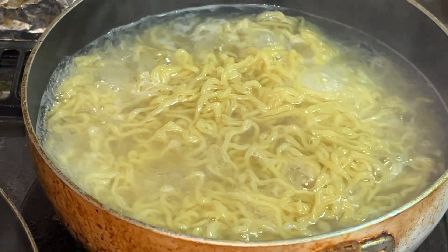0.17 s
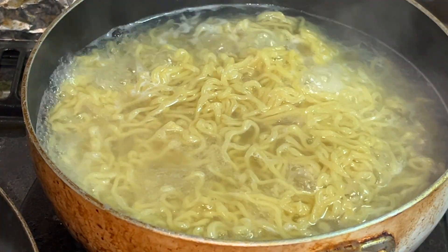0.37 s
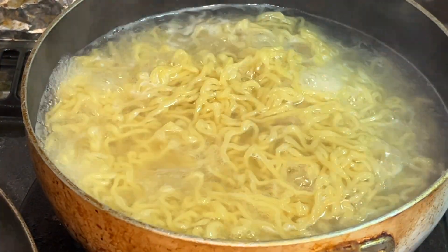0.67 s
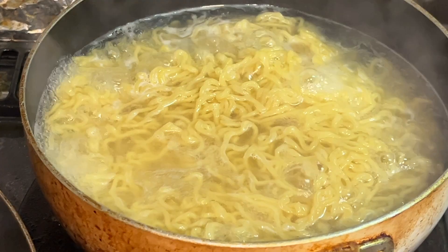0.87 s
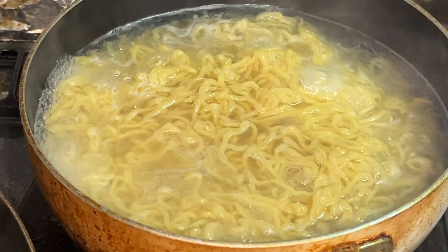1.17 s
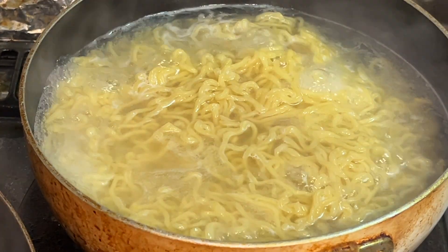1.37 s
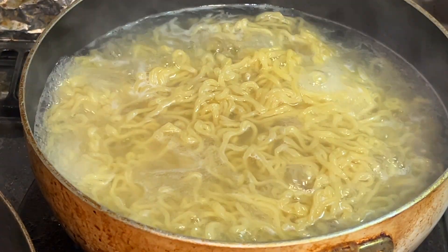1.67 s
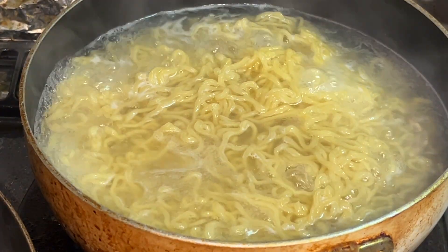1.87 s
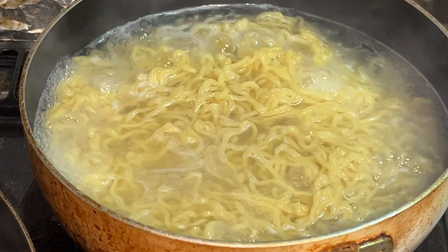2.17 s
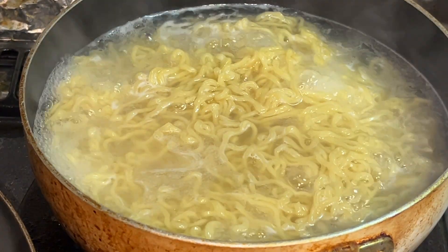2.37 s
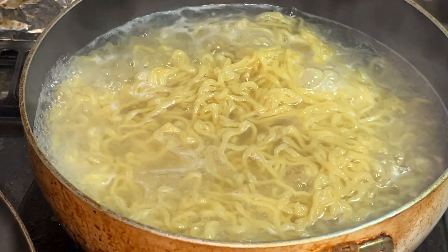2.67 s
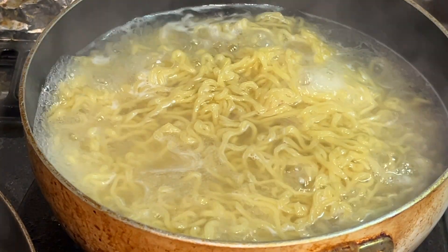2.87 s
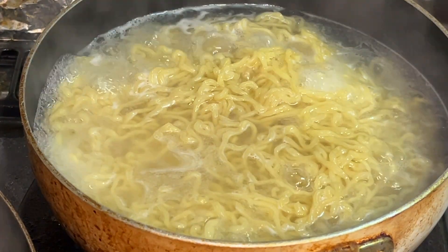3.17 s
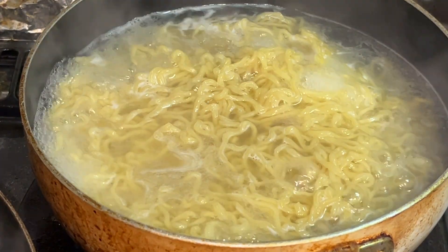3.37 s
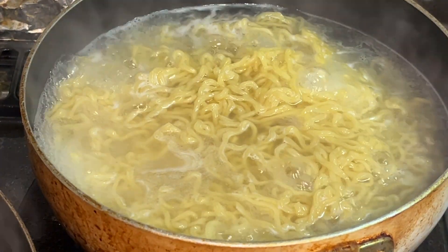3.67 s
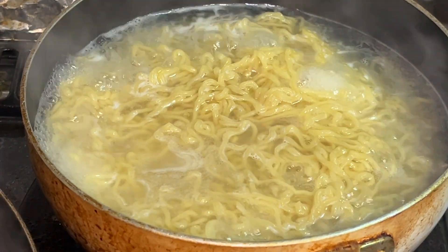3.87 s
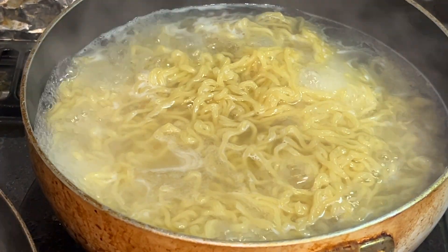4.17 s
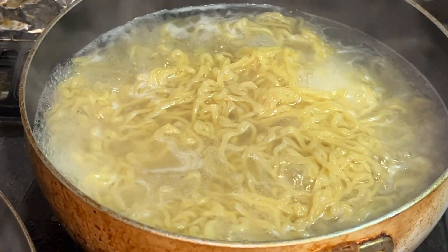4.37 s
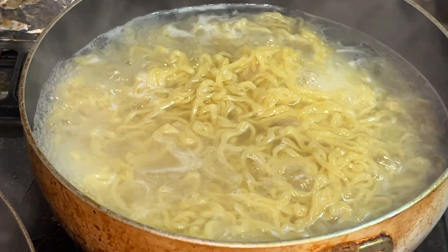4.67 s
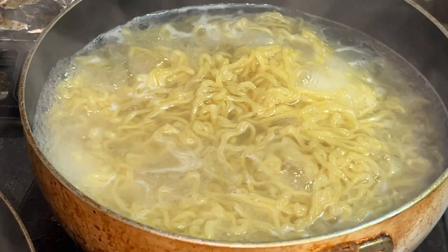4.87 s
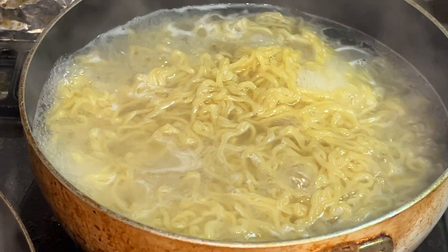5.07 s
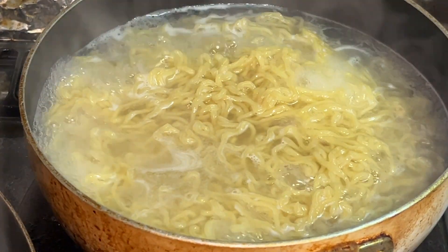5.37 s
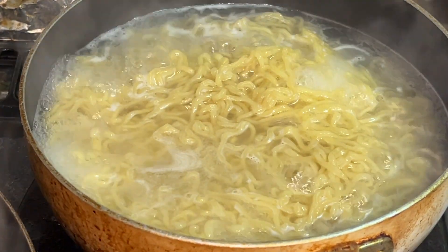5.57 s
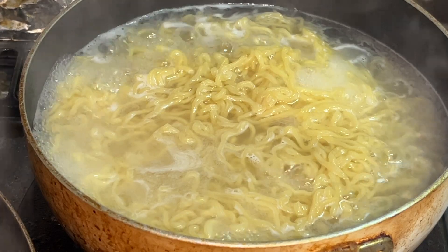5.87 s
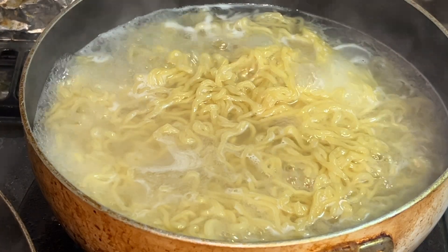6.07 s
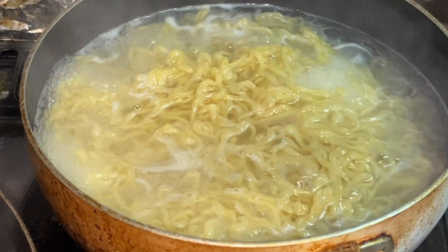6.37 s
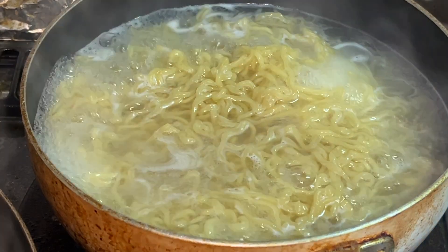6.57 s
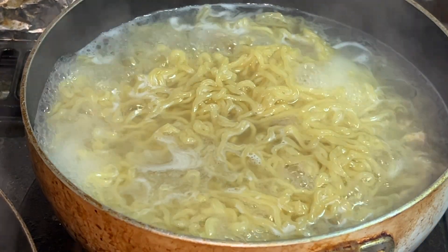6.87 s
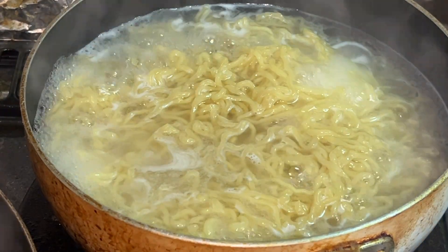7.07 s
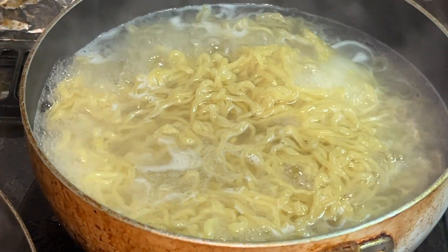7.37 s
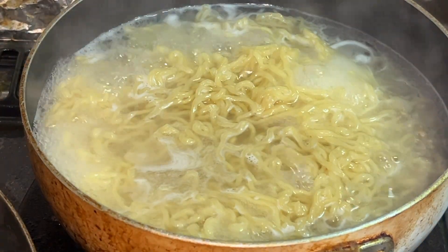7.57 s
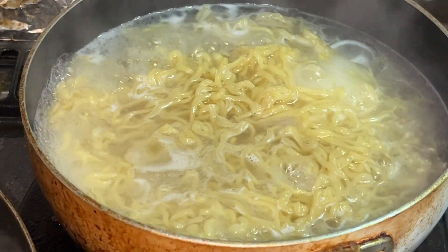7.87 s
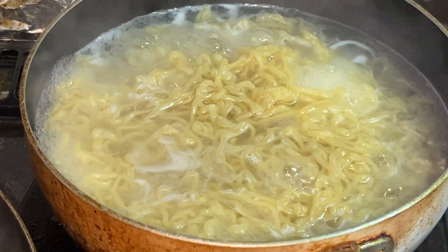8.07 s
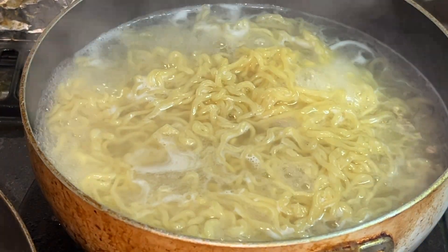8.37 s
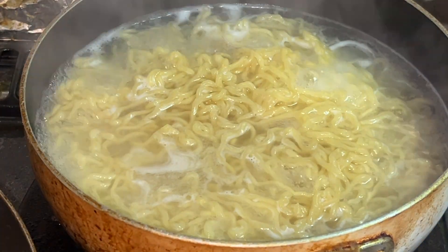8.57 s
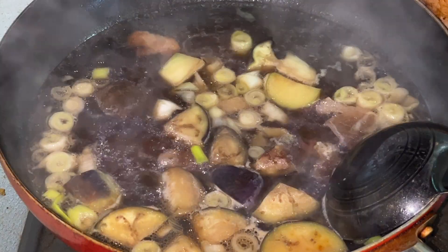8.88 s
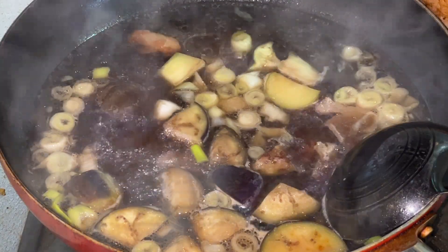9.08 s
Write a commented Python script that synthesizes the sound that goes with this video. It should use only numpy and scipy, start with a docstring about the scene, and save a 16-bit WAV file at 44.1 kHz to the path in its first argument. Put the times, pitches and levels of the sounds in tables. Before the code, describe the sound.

A pan of noodles simmers softly under a droning cooker hood, with two short tap bursts, a pipe shudder and a hard knock on the worktop.

```python
"""A pan of noodles simmers in a small kitchen, heard by a phone close by: each bubble is a rising, decaying sine.
Behind it a cooker hood runs: coloured noise for the air rush, wavering shaft multiples for the fan.
A tap runs twice as hiss and splash noise, and each time shuts with a short shudder of its pipe, a set of ringing modes.
Something hard is knocked down on the worktop, also as modes; drops and ticks are puffs of filtered noise.
Two partly alike noise fields, shifted in phase and level, make the pair of microphone ports."""
import sys
import numpy as np
from scipy import signal
from scipy.fft import rfft, irfft, next_fast_len
from scipy.io import wavfile
from scipy.ndimage import uniform_filter1d

SR = 44100
rng = np.random.default_rng(int(sys.argv[2]) if len(sys.argv) > 2 else 0)


def master(y):
    """Save y as 16-bit WAV."""
    cut = np.clip(np.atleast_2d(y).T, -1, 1)
    pcm = np.round(cut * 32767)  # scale
    wavfile.write(sys.argv[1], SR, pcm.astype(np.int16))


N = 407484
T = np.arange(N) / SR
M = next_fast_len(N + SR)  # transform length, with a second of room for tails
HZ = np.maximum(np.arange(M // 2 + 1) * SR / M, 1)

# spectrum of the hood's air rush with the burner flame, relative: pitch_hz, density_db
RUSH_SPECTRUM = [(21, -54), (35, 8.5), (60, -7), (134, -6.5), (173, -11.5), (302, -15), (528, -14),
                 (922, -25), (2020, -27.5), (3200, -31.5), (6500, -39.5), (8500, -47), (11500, -42.5),
                 (15500, -44)]
# resonances and dips added to that spectrum: pitch_hz, width_hz, level_db
RUSH_RESONANCES = [(238, 134, 4.5), (355.6, 17.4, -12.5), (452, 75, 3), (728, 86, 3.5), (1024, 22, 5.5),
                   (1252, 110, -3), (1723, 5.1, 9), (1640, 620, 4.5), (2017, 12, 8.5)]
# rise and fall of three bands of the rush; treble and top drop near 8.9 s:
# time_s, middle_db, treble_db, top_db
RUSH_BAND_LEVELS = [(0, -2.5, -4, -2), (.26, 5, -1.5, -3.5), (.55, 0, -4, -4), (1.9, 0, -5, -2),
                    (2.18, 2.5, -6, 1), (2.5, 0, -2, -0.5), (4.5, 1.5, -5, -2.5), (5.9, 2.5, -3.5, -3),
                    (7.2, 1, -2, -2.5), (8.75, 0.5, -2.5, -4), (8.92, 0.5, -6, -8), (9.24, 1, -5, -7)]
# level of the fan's throb, rising and falling over time: time_s, low_multiples_db, upper_multiples_db
FAN_LEVELS = [(0.0, -40.5, -41), (0.41, -40.5, -41.5), (2.49, -40.5, -40.5), (2.65, -40.5, -40),
              (3.06, -39, -45), (3.4, -41, -46), (3.76, -33.5, -40), (4.14, -42, -43.5), (4.58, -39, -38.5),
              (5.04, -40.5, -48.5), (6.31, -35.5, -40.5), (6.72, -41.5, -43), (7.18, -37, -52),
              (7.36, -38, -41.5), (7.72, -38.5, -48.5), (8.26, -39.5, -39), (8.59, -40, -47),
              (9.24, -47.5, -42)]
# low multiples of the shaft rate, relative: multiple, level_db, waver_db
FAN_LOW_MULTIPLES = [(2, -6, 0), (3, 1, 3), (4, 0.5, 3.5)]
# upper multiples of the shaft rate, relative: multiple, level_db, waver_db
FAN_UPPER_MULTIPLES = [(5, -1.5, 3.6), (6, -0.5, 3.3), (7, -15, 4)]
# blade tones at shaft multiples: multiple, level_db, waver_db
BLADE_MULTIPLES = [(11, -55, 5), (22, -55.5, 4.5)]
# tap runs: open_s, full_flow_s, shut_s, hiss_db, splash_db, hiss_held_back_db, splash_held_back_db,
# narrowness (0 to 1); the held-back levels are relative to full flow
TAP_RUNS = [(1.352, 1.554, 2.57, -51.5, -45.5, -6.5, -7.5, 0.55),
            (4.777, 4.99, 5.475, -46, -48.5, -2, -3.5, 0.9)]
# spectrum of the stream's splash, relative: pitch_hz, density_db
SPLASH_SPECTRUM = [(700, -20), (1300, -6.5), (1700, -7), (2200, -4), (2610, -3.5), (3370, -7), (4700, -6),
                   (6360, -5), (8000, -9), (10000, -12), (15000, -33)]
# spectrum of the valve hiss, relative: pitch_hz, density_db
VALVE_SPECTRUM = [(5500, -11), (8000, -13), (9900, 4.5), (11300, 1), (12800, 0), (14000, 3), (15600, -14)]
# valve resonances, scaled by the narrowness of the run: pitch_hz, width_hz, level_db
VALVE_RESONANCES = [(10100, 100, 3), (11200, 180, 5), (11750, 150, 5), (12300, 60, 3), (12600, 60, 4)]
# bands that ring under the stream, relative to the splash: pitch_hz, drift_hz, level_db
SINK_BANDS = [(2740, 80, -9.5), (3220, 130, -14), (4220, 220, -12)]
# jolts of the pipe, levels before the shake and mode offsets: start_s, hold_s, lowest_mode_db,
# second_mode_db, upper_modes_db, rattle_db, thump_db, pitch_share (of the modes under 1000 Hz)
PIPE_JOLTS = [(2.570, 0.024, -31, -28, -39, -43, -45, 1.08),
              (2.594, 0.013, -29, -45, -35, -51.5, -45, 0.97),
              (2.612, 0.012, -42, -29, -46, -48, -45, 1.02),
              (5.474, 0.023, -26.5, -30.5, -38, -40, -30, 1.03),
              (5.507, 0.011, -40, -29.5, -45, -47, -18, 0.98)]
# pipe modes: pitch_hz, waver_hz, level_db, group (0 lowest, 1 second, 2 upper)
PIPE_MODES = [(222, 7, 0, 0), (452, 15, 0, 1), (680, 22, -3, 2), (880, 35, -8, 2), (1150, 34, -3, 2),
              (1600, 50, -12, 2), (1830, 50, -11, 2)]
# blows on the worktop, levels before the mode offsets: start_s, level_db, body_db, thump_db,
# tilt_db_per_octave (above 2500 Hz); body and thump are relative to level_db
BLOWS = [(6.3175, -11, -8, -5, 2.5), (6.3786, -18.5, -4, 1, -2.5), (6.4048, -22.5, -9, 7.5, -21),
         (6.4162, -21, -5, 3, -6), (6.434, -29.5, -3, 14, -5), (6.451, -30, 0, 9, -6)]
# modes of the hard object: pitch_hz, level_db, t60_s
OBJECT_MODES = [(1618, -6.5, 0.085), (1750, -8, 0.082), (2400, -5, 0.022), (2920, -2, 0.024),
                (3500, 0, 0.02), (4110, 5.5, 0.011), (4550, -11, 0.013), (5180, -16, 0.015)]
# modes of its hollow body: pitch_hz, level_db, t60_s
BODY_MODES = [(256, -5, 0.11), (338, -6, 0.098), (553, 14.5, 0.013), (713, 7, 0.018), (818, -8.5, 0.094)]
# modes of the sink and the worktop; the sink rings 2.1 times as long: pitch_hz, level_db, t60_s
THUMP_MODES = [(64, -3, .1), (82, 0, .11), (128, -6, .09)]
# clear drops: start_s, level_db, centre_hz, width (share of the centre); the row at 6.452 s is a late ring of
# the last blow
CLEAR_DROPS = [(.232, -46, 3930, 0.9), (.585, -45.5, 4970, 1), (1.156, -42.5, 3200, 0.72),
               (1.386, -39, 4580, 0.31), (1.388, -33, 696, 1), (1.389, -43, 2400, .6),
               (1.488, -39.5, 4500, .8), (1.490, -37.5, 2900, 0.2), (1.524, -34.5, 4500, 0.3),
               (1.582, -43, 4330, .15), (1.592, -43, 4900, .2), (2.155, -37, 3020, 0.7),
               (2.161, -34, 2500, 0.54), (2.168, -38, 4200, .6), (2.29, -37, 6500, .3),
               (2.429, -37, 4280, 0.35), (2.433, -41, 2780, .3), (2.437, -41, 4300, .3),
               (2.581, -34, 4500, 0.12), (3.107, -43, 3540, 0.56), (4.113, -45, 4500, 0.4),
               (4.505, -37, 3800, 1), (4.506, -37, 1800, 1), (4.958, -37, 5200, .6),
               (4.962, -50, 2900, .15), (4.983, -44, 4500, .45), (5.001, -32, 3160, 0.24),
               (5.003, -34.5, 4650, 0.54), (5.004, -33, 2080, 0.69), (5.048, -46, 4250, .12),
               (5.048, -42, 2520, .4), (5.105, -39, 2490, .6), (5.198, -44, 3210, .5),
               (5.411, -37, 4000, 0.98), (5.42, -41, 2850, .12), (5.44, -39, 5595, .3),
               (6.452, -34, 1640, 0.16), (6.627, -42, 4870, 0.27), (6.832, -33, 4150, 0.17),
               (6.966, -36, 2580, 0.77), (6.98, -33, 5700, .14), (6.997, -39, 2520, 0.61),
               (7.301, -37, 7460, .13), (7.304, -40, 3420, 0.39), (7.431, -31.5, 3930, 0.15),
               (7.441, -45, 4100, 0.18), (7.492, -46, 3250, .18), (7.59, -40, 1700, 0.12),
               (7.726, -41, 4500, 0.49), (7.734, -32.5, 4500, 0.41), (7.741, -37, 2480, 1),
               (7.756, -35, 4470, 0.87), (7.767, -38, 4530, .33), (7.887, -48, 4300, 0.54),
               (7.889, -38, 2420, 0.14), (8.170, -49, 4600, 0.63), (8.172, -37, 3000, 0.45),
               (8.365, -40.5, 2530, .07), (8.397, -49, 3200, .3), (8.437, -45, 3980, 0.91),
               (8.475, -46, 4500, 0.79), (8.548, -44, 3000, .6), (8.570, -37.5, 5230, 0.13),
               (8.586, -48, 3200, .25), (8.672, -38, 1700, 0.1), (8.682, -40, 1650, 0.1),
               (8.674, -37, 5300, 0.12), (8.704, -43, 4670, .09), (8.73, -46, 6800, .3),
               (8.800, -46, 3500, 0.71), (8.990, -51, 1207, 0.018)]
# clear bright ticks of bursting foam, played 2.5 dB above level_db: start_s, level_db
CLEAR_TICKS = [(1.3723, -43), (1.5594, -38), (2.1296, -39), (2.5676, -37), (4.5052, -55), (4.7935, -50),
               (5.5079, -44), (6.6104, -47), (6.769, -49), (6.8314, -48), (6.9476, -50), (7.7373, -39),
               (8.159, -45), (8.5689, -45), (8.7284, -49)]
# fits of fine crackle in the pan: start_s, end_s, level_db (raised at random for each burst)
CRACKLE_FITS = [(6.545, 7.023, -47.5), (7.246, 7.8, -57), (7.85, 8.304, -58), (8.379, 8.501, -51),
                (8.53, 8.818, -53)]
# the two microphone ports: pitch_hz, likeness (0 to 1), left_lead_half_turns, left_minus_right_db
MIC_PORTS = [(60, .995, 0., -.8), (260, .82, 0., -1.6), (400, .74, .05, -1.5), (520, .72, .1, .3),
             (650, .25, .2, 1.4), (800, .33, .6, -1.6), (1030, .33, .3, 1.8), (1160, .46, 0., 1.),
             (1290, .06, .5, -3.), (1500, .5, 1., -6.), (1800, .85, .06, -7.), (2100, .76, .06, -4.),
             (2450, .85, .06, -2.3), (3300, .98, 0., 0.), (5400, .98, 0., 0.), (5900, .78, -.3, 0.),
             (7000, .72, -.45, 0.), (7500, .8, -.7, 0.), (7900, .98, -.97, 0.), (8900, .98, -1.03, 0.),
             (9300, .78, -1.2, 0.), (10400, .68, -1.57, 0.), (11200, .95, -1.9, 0.),
             (12700, .98, -2.03, 0.), (13100, .76, -2.15, 0.), (14000, .68, -2.6, 0.),
             (14700, .98, -3., 0.)]

RUSH_DB, SHAFT_HZ, MIDDLE_WAVER_DB = -37.5, 23.91, 0.55
OPEN_S, SPURT_S, SPURT_DB, FILL_S = 0.033, 0.045, 1.5, 0.057
HISS_SAG_DB_PER_S, SQUEEZE_S, SQUEEZE_DB, DRAIN_S = 2, 0.015, 3.5, 0.09
SHAKE_RISE_S, SHAKE_FALL_S = 0.011, 0.047
FAINT_TICK_DB, FAINT_DROP_DB = -56, -54  # before a random lift
FAINT_UNTIL_S = 8.85  # faint drops and ticks are heard to start only before this
BUBBLE_DB, BUBBLE_GLIDE, BUBBLE_CYCLES = 1, 0.11, 42  # the trapped bubble of a clean drop
DROP_CYCLES, SPLAT_T60_S = 60, 0.035  # length of a clean drop; added for a broad splat
GULP_DB = -41.5
ROOM_T60_S, WATER_ROOM_DB = 0.13, -1
KNOCK_ROOM_DB, PIPE_ROOM_DB = -3.5, -5.5  # close blows send less to the walls
TOP_HZ = 15720


def undb(db):
    """Gain of a level in dB."""
    return np.exp(np.asarray(db) * np.log(10) / 20)


def unit(x):
    """Scale to an rms of 1."""
    return x / np.sqrt(np.mean(x ** 2, axis=-1, keepdims=True))


def decay(t, t60):
    """Exponential fall of 60 dB in t60 seconds."""
    return np.exp(-np.log(1000) * t / t60)


def on_hz(table, column=1):
    """A table column read at every frequency bin, straight on a log axis."""
    table = np.array(table, float)
    return np.interp(np.log(HZ), np.log(table[:, 0]), table[:, column])


def over_time(table, column):
    """A table column read at every sample, straight between its times."""
    table = np.array(table, float)
    return np.interp(T, table[:, 0], table[:, column])


def bumps(peaks):
    """Resonances as bell curves in dB."""
    return sum(db * np.exp(-((HZ - hz) / width) ** 2) for hz, width, db in peaks)


def rise(hz, octaves):
    """Gain that climbs from 0 at hz to 1 some octaves above."""
    return np.clip(np.log2(HZ / hz) / octaves, 0, 1)


def colour(x, gain):
    """Filter by a gain for each frequency bin."""
    return irfft(rfft(x, M) * gain, M)[..., :N]


def shape(times, dbs):
    """Gain that runs straight in dB through a few moments, silent outside them."""
    gain = np.zeros(N)
    span = slice(int(times[0] * SR), int(times[-1] * SR))
    gain[span] = undb(np.interp(T[span], times, dbs))
    return gain


def walk(rate):
    """Random levels held about 1 / rate s and slewed twice; spread near 1."""
    hold = max(int(SR / 32 / rate), 2)  # in steps of 32 samples
    steps = np.repeat(rng.standard_normal(N // 32 // hold + 2), hold)
    coarse = uniform_filter1d(uniform_filter1d(steps, hold), hold)
    return 1.3 * uniform_filter1d(coarse.repeat(32), 32)[:N]


def restless(swell_db, flicker_db, rate, octaves):
    """Two unrelated noises whose octave bands swell together and flicker alone."""
    spectrum = rfft(rng.standard_normal((2, N)), M)
    pitch = np.log2(HZ)
    out = 0
    for octave in octaves:
        share = np.cos(np.pi / 2 * np.clip(pitch - octave, -1, 1)) ** 2
        band = irfft(spectrum * share, M)[:, :N]
        out = out + band * undb(flicker_db * walk(rate))
    return out * undb(swell_db * walk(3.1))


def add(out, s, hz, t60, peak, glide=0., push=.0002):
    """One decaying ring that starts at s after a short push, rising in pitch if it has a glide."""
    t = np.arange(int(t60 * SR)) / SR
    sine = np.sin(2 * np.pi * hz * t * (1 + glide * t / t60))
    ring = peak * sine * decay(t, t60) * (1 - np.exp(-t / push))
    i = int(s * SR)
    out[i:i + len(t)] += ring[:max(N - i, 0)]


def puff(hz, share, t60, size=4096):
    """A click and a decaying breath of noise through a steep resonance, peak 1."""
    burst = rng.standard_normal(size) * decay(np.arange(size) / SR, t60)
    burst[0] += 4
    band = signal.iirpeak(hz, 1 / np.clip(0.92 * share, .02, 1.5), SR)
    ring = signal.lfilter(*band, signal.lfilter(*band, burst))
    return ring / np.abs(ring).max()


def kitchen(x, sent):
    """Direct sound plus two unrelated decaying tails of what reaches the walls, thin in bass and top."""
    t = np.arange(SR // 2) / SR
    tails = rng.standard_normal((2, len(t))) * decay(t, ROOM_T60_S) * (t > .004)
    tails = tails / np.sqrt(np.sum(tails ** 2, axis=1, keepdims=True))
    thinning = np.sqrt((1 + (HZ / 5000) ** 2) * (1 + (150 / HZ) ** 2))
    return x + colour(sent, rfft(tails, M) / thinning)


def air_rush():
    """Turbulent air as noise coloured by the duct; its middle, treble and top bands rise and fall over time."""
    spectrum_db = on_hz(RUSH_SPECTRUM) + bumps(RUSH_RESONANCES)
    rush = unit(colour(restless(0.093, 0.88, 18, range(6, 15)), undb(spectrum_db))) * undb(RUSH_DB)
    treble = colour(rush, rise(1800, 0.86))
    top = colour(rush, rise(7500, .2))
    middle = colour(rush, rise(170, 1.1) * np.clip(np.log2(1900 / HZ) / 0.47, 0, 1))
    middle_db = over_time(RUSH_BAND_LEVELS, 1) + MIDDLE_WAVER_DB * walk(3.984)
    treble_db, top_db = over_time(RUSH_BAND_LEVELS, 2), over_time(RUSH_BAND_LEVELS, 3)
    rush = rush + top * (undb(top_db) - 1)
    rush = rush + (treble - top) * (undb(treble_db) - 1)
    return rush + middle * (undb(middle_db) - 1)


def fan():
    """A turning shaft sounds at multiples of its unsteady rate, each wavering in level and phase."""
    turn = 2 * np.pi * np.cumsum(SHAFT_HZ * (1 + 0.00405 * walk(1.5))) / SR

    def multiples(table):
        out = 0
        for multiple, db, waver_db in table:
            phase = rng.uniform(0, 2 * np.pi) + 1.39 * walk(5)
            out = out + undb(db + waver_db * walk(14)) * np.sin(multiple * turn + phase)
        return out

    low = unit(multiples(FAN_LOW_MULTIPLES)) * undb(over_time(FAN_LEVELS, 1))
    upper = unit(multiples(FAN_UPPER_MULTIPLES)) * undb(over_time(FAN_LEVELS, 2))
    return low + upper + multiples(BLADE_MULTIPLES)


def hood():
    """The running cooker hood: its air rush and its fan."""
    return air_rush() + fan()


def tap():
    """The valve spurts, holds back until the spout fills, hisses, squeezes shut; the stream splashes in grains."""
    jet = restless(.9, 1.2, 20, range(13, 15))
    grains = undb(1.2 * rng.exponential(size=N // 64 + 1)).repeat(64)[:N]
    splash = unit(colour(grains * restless(0.44, 1.6, 20, range(10, 15)), undb(on_hz(SPLASH_SPECTRUM))))
    rings = 0
    for hz, drift, db in SINK_BANDS:
        tone = np.sin(2 * np.pi * np.cumsum(hz + drift * walk(4)) / SR)
        # a fast random level spreads the tone into a narrow band
        rings = rings + undb(db + 1.8 * walk(15)) * walk(450) * tone
    out = 0
    for opens, full, shuts, hiss_db, splash_db, hiss_back, splash_back, narrow in TAP_RUNS:
        spurt_end = opens + OPEN_S + SPURT_S
        times = [opens, opens + OPEN_S, spurt_end, full - FILL_S, full, shuts - SQUEEZE_S, shuts, shuts + DRAIN_S]
        sag = -HISS_SAG_DB_PER_S * (shuts - full)
        hiss_course = np.array([-18, SPURT_DB, hiss_back, hiss_back, 0, sag, sag + SQUEEZE_DB, -17])
        splash_course = np.array([-22, splash_back + SPURT_DB, splash_back, splash_back, 0, -2, -1, -18])
        hiss = unit(colour(jet, undb(on_hz(VALVE_SPECTRUM) + narrow * bumps(VALVE_RESONANCES))))
        out = out + hiss * shape(times, hiss_db + hiss_course)
        out = out + (splash + narrow * rings) * shape(times, splash_db + splash_course)
    return out


def shudder():
    """Stopped water jolts the pipe: modes ring unevenly over a rough knock, fittings rattle, the sink thumps."""
    def shake(s, hold, db):
        times = s + np.cumsum([0, SHAKE_RISE_S, hold, SHAKE_FALL_S])
        return shape(times, db + np.array([-15.5, -2.0, -5.0, -28]))

    out = np.zeros(N)
    jolt_times = [jolt[0] + SHAKE_RISE_S for jolt in PIPE_JOLTS]
    pitch = np.interp(T, jolt_times, [jolt[-1] for jolt in PIPE_JOLTS])
    for hz, waver, db, group in PIPE_MODES:
        mode_hz = hz * pitch if hz < 1000 else hz
        turn = 2 * np.pi * np.cumsum(mode_hz + waver * walk(60)) / SR
        gain = sum(shake(jolt[0], jolt[1], jolt[2 + group]) for jolt in PIPE_JOLTS)
        out += np.sqrt(2) * np.sin(turn) * undb(db + 2.5 * walk(90)) * gain
    centres = np.array([[500], [2200]])  # Hz, of the knock and the rattle
    bells = np.exp(-(np.log2(HZ / centres) / 1.44) ** 2)
    knock, rattle = unit(colour(rng.standard_normal(N), bells))
    for s, hold, _, _, _, rattle_db, thump_db, _ in PIPE_JOLTS:
        out += (knock * undb(6.0) + rattle) * shake(s, hold, rattle_db)
        for hz, mode_db, t60 in THUMP_MODES:
            add(out, s, hz, 2.1 * t60, undb(thump_db + mode_db), push=0.016)
    return out


def knocks():
    """Each blow rings the modes of the object, its hollow body and, swelling more slowly, the worktop."""
    out = np.zeros(N)
    for s, db, body_db, thump_db, tilt_db in BLOWS:
        layers = [(OBJECT_MODES, db - 8.0, .0006),
                  (BODY_MODES, db + body_db - 0.5, .002),
                  (THUMP_MODES[:2], db + thump_db + 7, .025)]  # the two lowest worktop modes
        for modes, layer_db, push in layers:
            for hz, mode_db, t60 in modes:
                c = rng.standard_normal()
                level_db = layer_db + mode_db + tilt_db * max(np.log2(hz / 2500), 0) + c
                # the modes start slightly apart, as the blow spreads through the object
                add(out, s + .001 * abs(c), hz * (1 + .006 * c), t60, undb(level_db), push=push)
        # loose parts rattle on after the blow
        rattle = undb(-15.0) * puff(3800, 1.44, 0.094, size=8192)
        rattle = rattle + undb(body_db - 3.5) * puff(1470, 1.0, 0.21, size=8192)
        out[int(s * SR):][:8192] += undb(db) * rattle
    return out


def drops(count=140):
    """A drop clicks in a broad band, or a narrow one with a rising bubble; foam ticks are brief bright puffs."""
    out = np.zeros(N + 4096)
    when, size, pitch = rng.random((count, 3)).T
    when = when * FAINT_UNTIL_S
    lift_db = -2.5 * np.log(size)
    # every fifth random moment has a faint drop as well as a faint tick
    faint_drops = [(s, FAINT_DROP_DB + up, 2500 * 2.74 ** p, .6)
                   for s, up, p in zip(when[::5], lift_db[::5], pitch[::5])]
    faint_ticks = list(zip(when, FAINT_TICK_DB + lift_db))
    for s, db, hz, share in CLEAR_DROPS + faint_drops:
        splat = puff(hz, share, DROP_CYCLES / hz + SPLAT_T60_S * share)
        out[int(s * SR):][:4096] += undb(db) * splat
        bubble = undb(db + BUBBLE_DB) * max(1 - 0.73 * share, 0)  # weaker in broad drops
        add(out, s, hz * (1 - BUBBLE_GLIDE / 2), BUBBLE_CYCLES / hz, bubble, BUBBLE_GLIDE)
    for s, db in CLEAR_TICKS + faint_ticks:
        out[int(s * SR):][:4096] += undb(db + 2.5) * puff(9600, 0.82, 0.043)
    return out[:N]


def simmer(count=1100):
    """Steam bubbles burst at random, most faint, a few clear; large ones gulp low; foam crackles in fits."""
    out = np.zeros(N)
    for when, pitch, size in rng.random((count, 3)):
        hz = 300 * 40 ** pitch
        level_db = -47.0 - 15 * pitch - 2.7 * np.log(size + .02)
        add(out, when * N / SR, hz, 9 / hz, undb(level_db), glide=0.56)
    for when, pitch, size in rng.random((count // 8, 3)):  # gulps
        hz = 110 * 5 ** pitch
        level_db = GULP_DB - 6 * pitch - 2.7 * np.log(size)
        add(out, when * N / SR, hz, 12 / hz, undb(level_db), glide=0.27, push=0.0048)
    for start, end, db in CRACKLE_FITS:
        for when, pitch, size in rng.random((count // 40, 3)):
            hz = 2400 * 2.8 ** pitch
            add(out, start + when * (end - start), hz, 22 / hz, undb(db - 3.2 * np.log(size)), glide=0.16)
    return out


def scene():
    """Two versions of the field, the same in the fan and the direct events but with unrelated noise and room
    tails, mixed and shifted as the two microphone ports hear them."""
    pipe, blows = shudder(), knocks()
    water = drops() + simmer()
    sent = undb(WATER_ROOM_DB) * water + undb(PIPE_ROOM_DB) * pipe + undb(KNOCK_ROOM_DB) * blows
    field = hood() + tap() + kitchen(water + pipe + blows, sent)
    first, second = rfft(field, M)
    shared, apart = (first + second) / np.sqrt(2), (first - second) / np.sqrt(2)
    likeness = np.clip(on_hz(MIC_PORTS, 1), 0, 1)
    same = np.sqrt((1 + likeness) / 2) * shared
    other = np.sqrt((1 - likeness) / 2) * apart
    # half of the lead and level difference goes to each port
    tilt = undb(on_hz(MIC_PORTS, 3) / 2) * np.exp(.5j * np.pi * on_hz(MIC_PORTS, 2))
    left, right = (same + other) * tilt, (same - other) / tilt
    return irfft(np.array([left, right]), M)[:, :N]


def record(dry):
    """The microphone drops the deepest bass; a steep cut at the top."""
    bass_cut = signal.butter(4, 36, "high", fs=SR, output="sos")
    top_cut = signal.ellip(8, .2, 70, TOP_HZ, fs=SR, output="sos")
    return signal.sosfilt(top_cut, signal.sosfilt(bass_cut, dry))


dry = scene()
out = record(dry)
master(out)
```